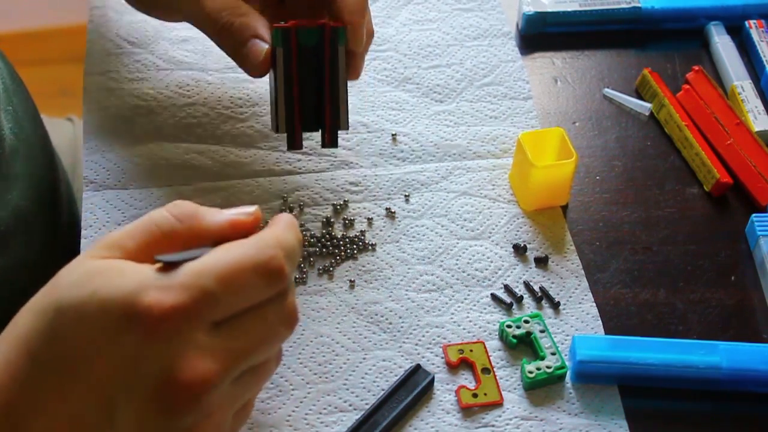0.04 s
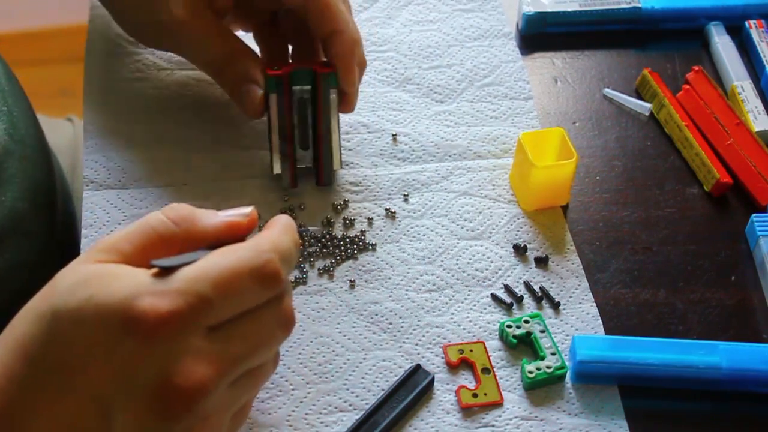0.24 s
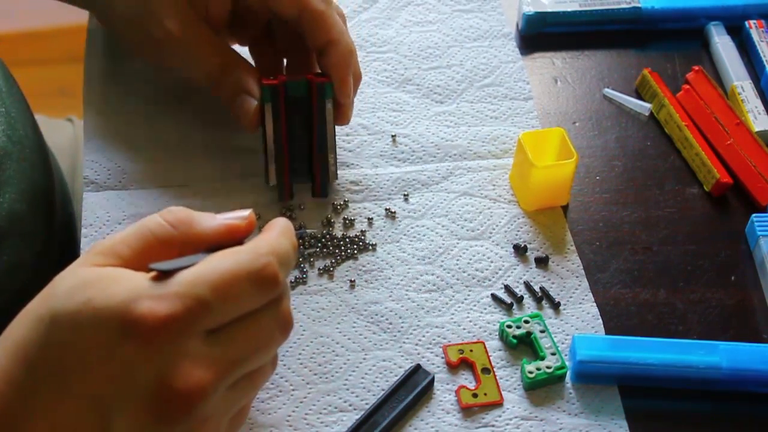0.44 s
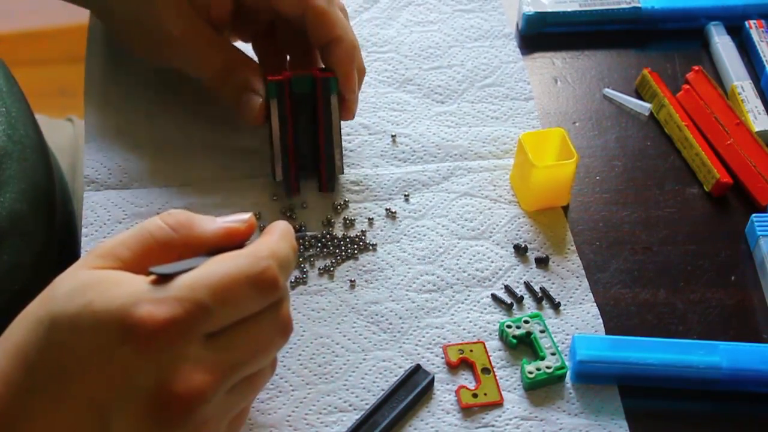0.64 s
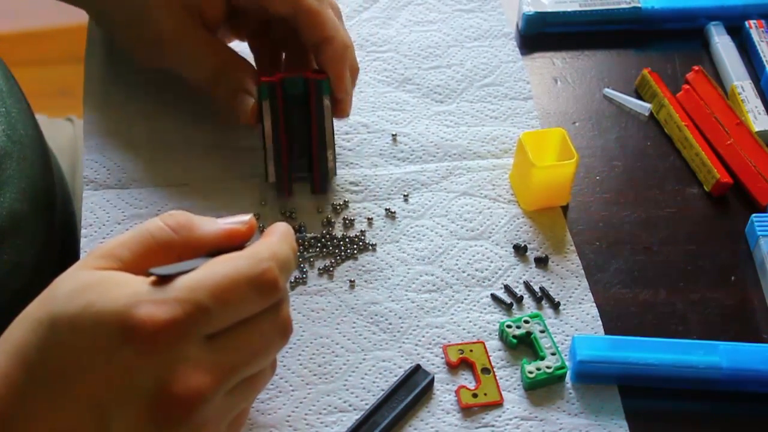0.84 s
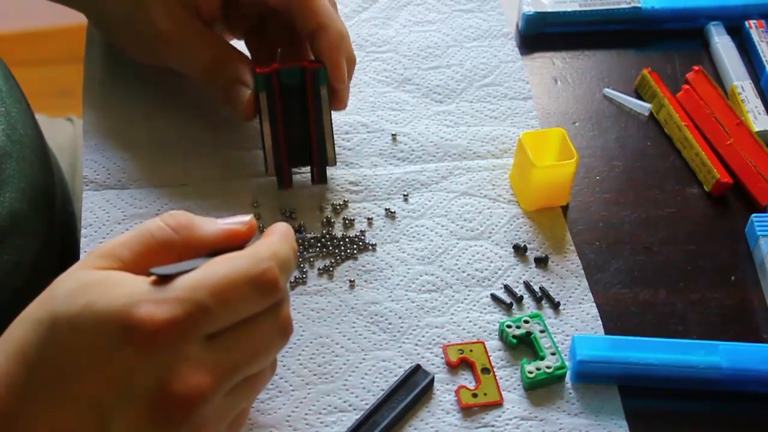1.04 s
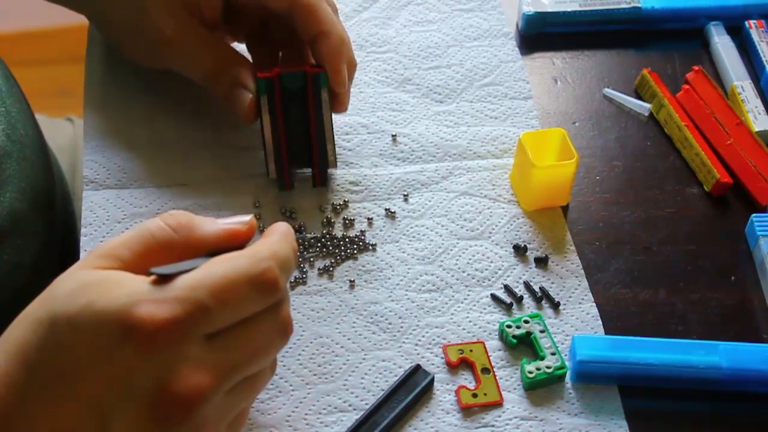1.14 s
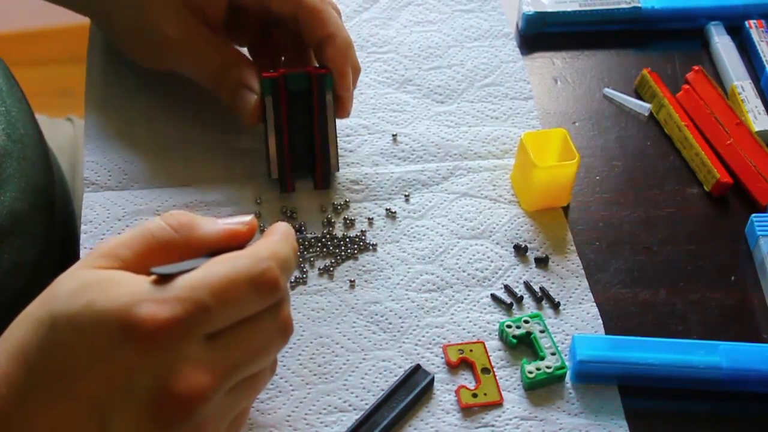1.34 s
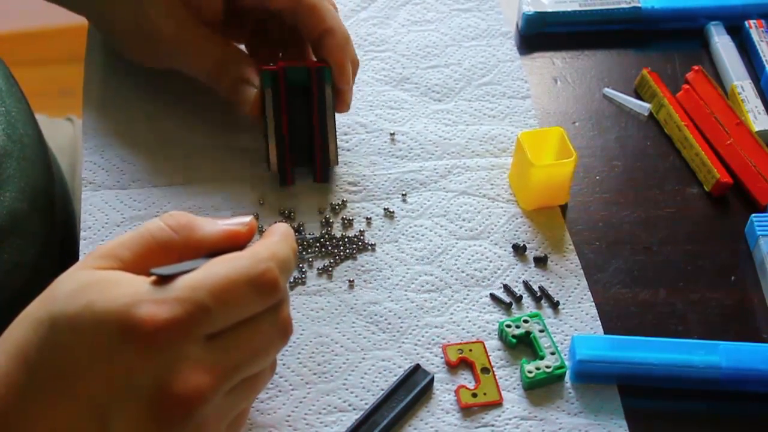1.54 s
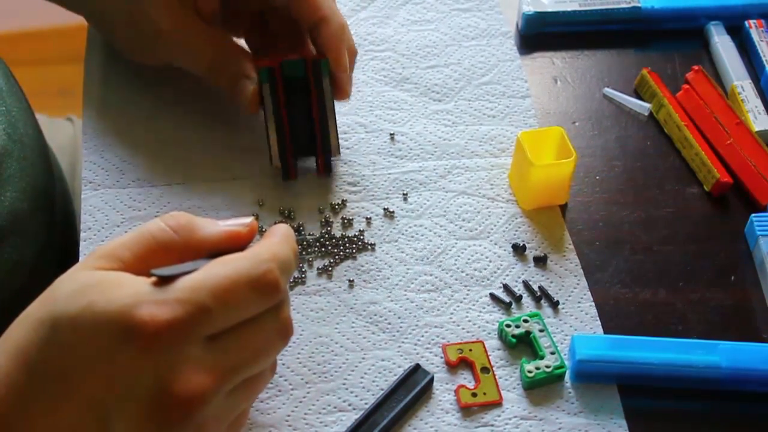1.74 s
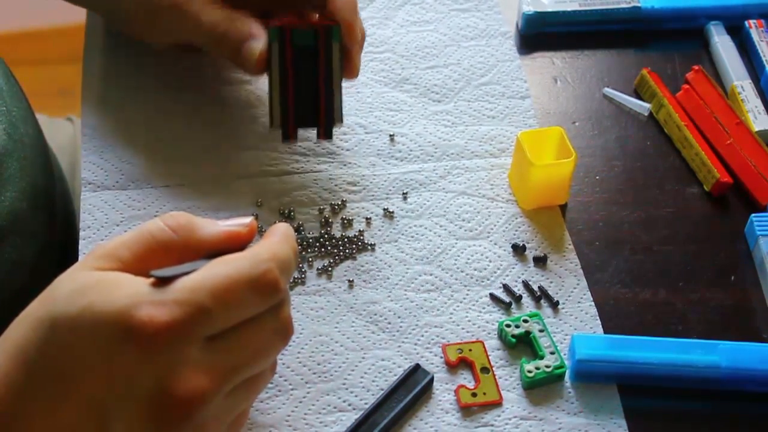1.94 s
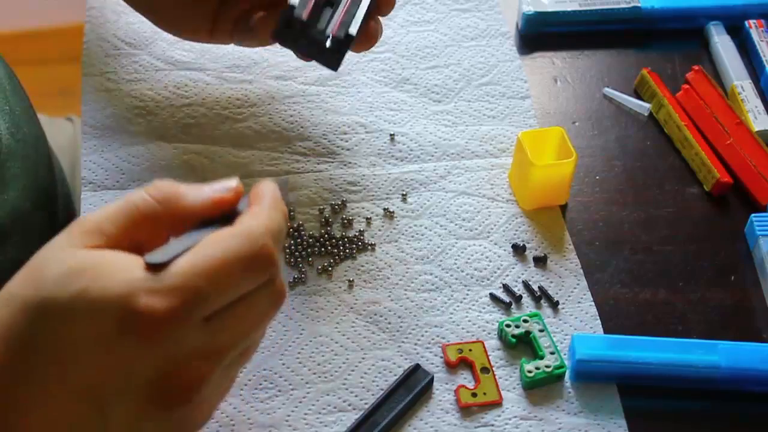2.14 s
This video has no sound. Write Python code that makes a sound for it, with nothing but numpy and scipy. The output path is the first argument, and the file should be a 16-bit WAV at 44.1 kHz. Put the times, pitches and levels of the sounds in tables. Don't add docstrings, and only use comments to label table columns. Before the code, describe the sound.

Hard, loud wooden knocks of a metal block on a tabletop, with faint rattling of tiny steel balls

```python
import sys
import numpy as np
from scipy import signal
from scipy.io import wavfile

SR = 44100
rng = np.random.default_rng(int(sys.argv[2]) if len(sys.argv) > 2 else 0)


def volts_from_decibels(level):
    exponent = np.asarray(level, float) / 20
    return 10 ** exponent


def unload_audio(sound):
    columns = np.transpose(np.atleast_2d(sound))
    steps = np.round(np.clip(columns, -1, 1) * 32767)
    wavfile.write(sys.argv[1], SR, steps.astype(np.int16))


N = 97020

# start in seconds, force in dB, contact hardness in Hz, clack pitch in Hz.
LANDINGS = [(0.185, -36.5, 314, 350), (0.191, -20.5, 300, 406), (0.2, -38, 300, 397), (0.21, -18, 300, 420),
            (0.221, -10.5, 300, 500), (.231, -51, 300, 464), (0.2381, 2, 900, 690),
            (0.481, 5.5, 2170, 1004), (.4846, -2, 1260, 895), (.568, -2, 400, 650), (.6749, 7.5, 1620, 702),
            (0.683, -5.5, 800, 810), (.6875, -11, 700, 527), (0.8951, 5, 1800, 818),
            (0.9024, 2.5, 1600, 1015), (0.984, -0.5, 554, 740), (1.1238, 1.5, 1330, 754),
            (1.131, 3.5, 1060, 970), (1.2105, -1, 550, 1030), (1.337, 1.5, 970, 648),
            (1.3454, -1, 511, 480), (1.3504, -7.5, 520, 472), (1.359, -6, 537, 468), (1.424, -32, 500, 494),
            (1.5818, 3, 1620, 742), (1.589, 6, 1380, 1134), (1.67, -6, 600, 777), (1.8022, 4, 1480, 735),
            (1.811, -0.5, 1510, 970), (1.891, -8, 700, 660)]
# delay in seconds, level in dB.
CHATTER = [
    (0, -2.5),
    (.0011, -8.5),
    (.0026, -4.5),
    (.0043, -5.5),
]
# frequency in Hz, level in dB, T60 in seconds.
TABLE_MODES = [(178, -20.5, 0.039), (243, -9.5, 0.023), (297, -35.5, 0.031), (337.5, -13.5, 0.094),
               (434, -17.5, 0.016), (480, -7, 0.026), (626, -7, 0.049), (697.2, -6, 0.064),
               (722, -18, 0.023), (950.7, -12, 0.09), (1076, 1, 0.015), (1311, -9, 0.06),
               (1373, -4.5, 0.014), (2000, -12, 0.0055)]
# start in seconds, level in dB.
BALL_TICKS = [
    (0.1286, -29),
    (.181, -64),
    (0.192, -39),
    (.203, -39),
    (.217, -40),
    (.228, -43),
    (0.24, -29.5),
    (0.941, -52),
]
# frequency in Hz, level in dB, T60 in seconds.
STEEL_MODES = [(2020, -10, .11), (2450, -14, .03), (3320, 2, .02), (4000, -8, .02), (5300, -2, .015),
               (5700, -9, .08), (6050, 0, .02), (7400, -12, .03)]
# start in seconds, level in dB.
RATTLE_JOLTS = [(0.141, -51), (0.238, -44.5), (.44, -62), (0.479, -44), (0.673, -37.5), (0.896, -42),
                (1.124, -40), (1.336, -38), (1.584, -39), (1.801, -38.5), (1.97, -71), (2.09, -72)]
RATTLE_BAND_HZ = (3170, 6120)
# delay in seconds, level in dB.
WALL_ECHOES = [(.0135, -27), (.022, -11)]
# frequency in Hz, T60 in seconds.
ROOM_T60_S = [(100, 0.78), (300, 0.76), (700, 0.64), (2000, 0.79), (5000, 0.44), (13000, 0.86)]
# frequency in Hz, level in dB.
ROOM_COLOUR_DB = [(100, -10), (300, -5.5), (700, -9), (1500, -8.5), (2500, -1), (5000, -5.5), (8000, -18.5),
                  (13000, -22.5)]
# frequency in Hz, density in dB per Hz.
AIR_COLOUR_DB = [(18, -60), (30, 10), (121, 14.5), (280, -5), (461, -6.5), (540, -10), (4530, -20),
                 (8740, -25.5), (16000, -27)]

MODE_SPREAD_DB = 2.5
CLACK_DB, CLACK_T60_CYCLES = 11, 6.83
CRACK_DB, CRACK_LOW_HZ, CRACK_HIGH_HZ = 2.5, 900, 3045
TICK_DB, TICK_ROOM_DB = -9, -10
RATTLE_CLICKS_PER_S, RATTLE_DECAY_S, RATTLE_SIZES_DB = 5000, 0.035, 2.5
ECHO_TOP_HZ, ROOM_DB, ROOM_BUILD_S = 1800, -28, 0.005
AIR_DB = -46
MIC_LOW_HZ, MIC_TOP_HZ = 161, 16200
LIMIT_DB, LIMIT_SHARE, LIMIT_ATTACK_S, LIMIT_RELEASE_DB_PER_S = -5, 0.22, 0.014, 134


def knocks():
    t_s = np.arange(4000) / SR
    clack, clicks = np.zeros((2, N + SR))
    pulses = []
    for start_s, force_db, hard_hz, clack_hz in LANDINGS:
        push = t_s * np.exp(-2 * np.pi * hard_hz * t_s)
        pulse = volts_from_decibels(force_db - 3.5) * push / push.sum()
        pulses.append(pulse)
        i = int(start_s * SR)
        clack[i:i + len(t_s)] += volts_from_decibels(CLACK_DB) * ring(pulse, clack_hz, CLACK_T60_CYCLES / clack_hz)
        for delay_s, chatter_db in CHATTER:
            click_s = start_s + delay_s * rng.uniform(0.7, 1.3)
            click = volts_from_decibels(force_db + CRACK_DB + chatter_db) * (hard_hz / 1500) ** 2
            clicks[int(click_s * SR)] += click
    crack_band = signal.butter(2, [CRACK_LOW_HZ, CRACK_HIGH_HZ], "band", fs=SR, output="sos")
    crack = signal.sosfilt(crack_band, clicks[:N] + 1e-18)
    starts_s = [row[0] for row in LANDINGS]
    return strike(starts_s, pulses, TABLE_MODES) + clack[:N] + crack


def strike(starts_s, pulses, modes):
    spread = rng.standard_normal((40, len(modes)))
    out = np.zeros(N)
    for m, (hz, level_db, t60_s) in enumerate(modes):
        force = np.zeros(N + SR)
        for e, start_s in enumerate(starts_s):
            i = int(start_s * SR)
            force[i:i + len(pulses[e])] += pulses[e] * volts_from_decibels(level_db + MODE_SPREAD_DB * spread[e, m])
        out += (-1) ** m * ring(force[:N], hz, t60_s)
    return out


def ring(x, hz, t60_s):
    radius = volts_from_decibels(-60 / (t60_s * SR))
    w = 2 * np.pi * hz / SR
    return signal.lfilter([0, np.sin(w)], [1, -2 * radius * np.cos(w), radius * radius], x + 1e-18)


def ticks():
    starts_s = [start_s for start_s, _ in BALL_TICKS]
    pulses = [volts_from_decibels(level_db + TICK_DB) * np.ones(1) for _, level_db in BALL_TICKS]
    return strike(starts_s, pulses, STEEL_MODES)


def rattle():
    t_s = np.arange(N) / SR
    sizes = volts_from_decibels(RATTLE_SIZES_DB * np.minimum(rng.exponential(1, N), 4)) * rng.choice([-1, 1], N)
    hits = rng.random(N) < RATTLE_CLICKS_PER_S / SR
    band = signal.butter(1, RATTLE_BAND_HZ, "band", fs=SR, output="sos")
    clicks = signal.sosfilt(band, sizes * hits)
    envelope = np.zeros(N)
    for start_s, level_db in RATTLE_JOLTS:
        envelope += volts_from_decibels(level_db) * (t_s > start_s) * np.exp(-np.abs(t_s - start_s) / RATTLE_DECAY_S)
    return clicks / clicks.std() * envelope


def room(x):
    t_s = np.arange(N) / SR

    def decay(hz):
        return volts_from_decibels(ROOM_DB + at_hz(ROOM_COLOUR_DB, hz) - 60 * t_s / at_hz(ROOM_T60_S, hz))

    tail = bands(decay, rng.standard_normal((2, N)))
    tail *= 1 - np.exp(-(t_s / ROOM_BUILD_S) ** 2)
    echoes = np.zeros(N)
    for delay_s, level_db in WALL_ECHOES:
        echoes[int(delay_s * SR)] -= volts_from_decibels(level_db)
    echoes = signal.sosfilt(signal.butter(2, ECHO_TOP_HZ, fs=SR, output="sos"), echoes + 1e-18)
    return signal.fftconvolve(x, tail + echoes)[:N]


def bands(shape, white):
    edges_hz = 30 * 2 ** np.arange(0, 9.4, 1 / 3)
    total = 0
    for k, (low_hz, high_hz) in enumerate(zip(edges_hz, edges_hz[1:])):
        band = signal.butter(2, [low_hz, high_hz], "band", fs=SR, output="sos")
        total = total + shape(np.sqrt(low_hz * high_hz)) * signal.sosfilt(band, white[k % 2])
    return total


def at_hz(points, hz):
    points_hz, values = np.array(points).T
    return np.interp(np.log(hz), np.log(points_hz), values)


def air():
    noise = bands(lambda hz: volts_from_decibels(at_hz(AIR_COLOUR_DB, hz)), rng.standard_normal((2, N)))
    return volts_from_decibels(AIR_DB) * noise / noise.std()


def scene():
    blows = knocks() + rattle()
    steel = ticks()
    reverb = room(blows + volts_from_decibels(TICK_ROOM_DB) * steel)
    return (blows + steel + reverb + air())[None]


def low_pass(x):
    return signal.sosfilt(signal.butter(12, 17010, fs=SR, output="sos"), x)


def record(dry):
    x = signal.sosfilt(signal.butter(2, MIC_LOW_HZ, "high", fs=SR, output="sos"), dry)
    x = signal.sosfilt(signal.cheby2(10, 40, MIC_TOP_HZ, fs=SR, output="sos"), x)
    over_db = np.maximum(20 * np.log10(np.abs(x[0]) + 1e-9) - LIMIT_DB, 0)
    ramp_db = LIMIT_RELEASE_DB_PER_S * np.arange(N) / SR
    held_db = np.maximum.accumulate(over_db + ramp_db) - ramp_db
    pole = np.exp(-1 / (LIMIT_ATTACK_S * SR))
    smooth_db = signal.lfilter([1 - pole], [1, -pole], held_db)
    x = x * volts_from_decibels(-LIMIT_SHARE * smooth_db)
    return low_pass(np.clip(x, -1, 1))


dry = scene()
out = record(dry)
unload_audio(out)
```